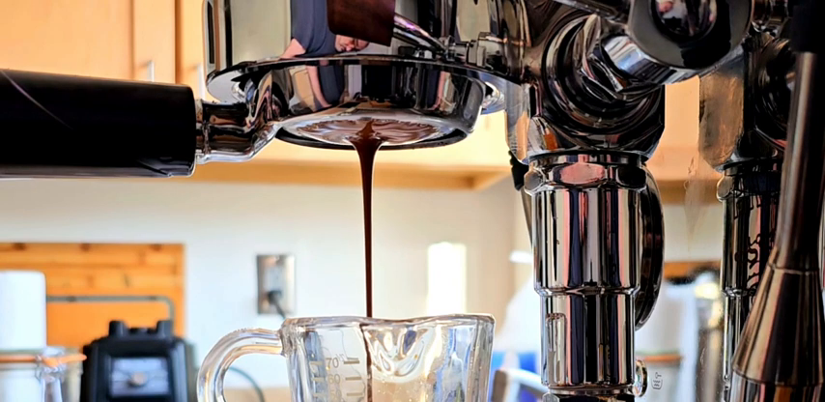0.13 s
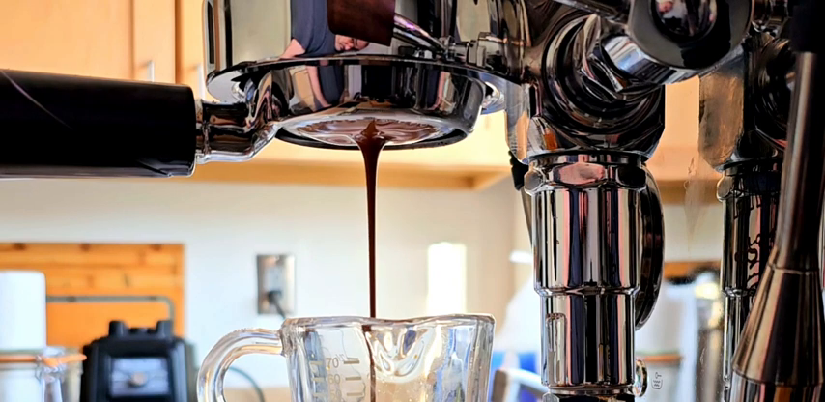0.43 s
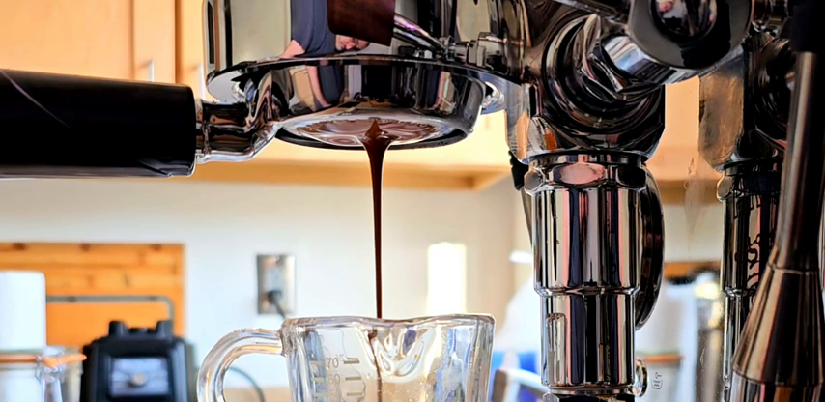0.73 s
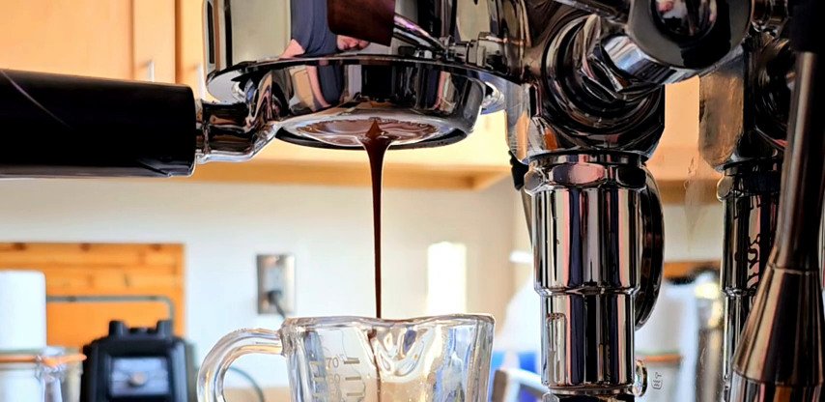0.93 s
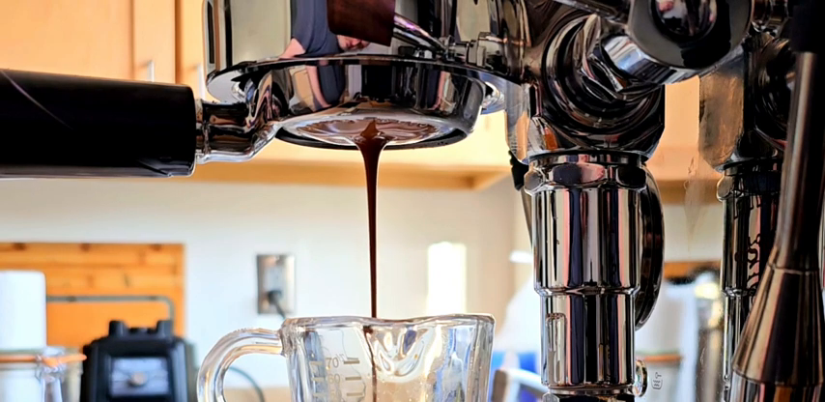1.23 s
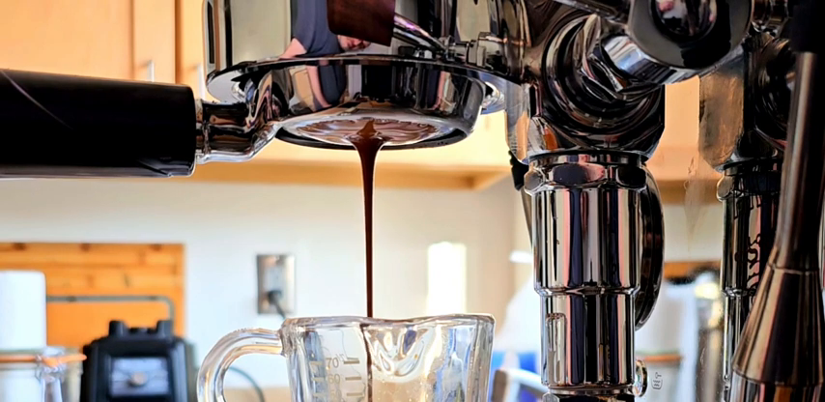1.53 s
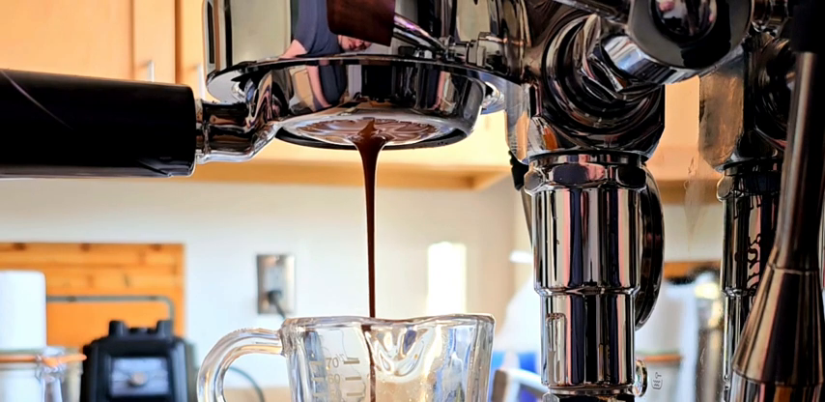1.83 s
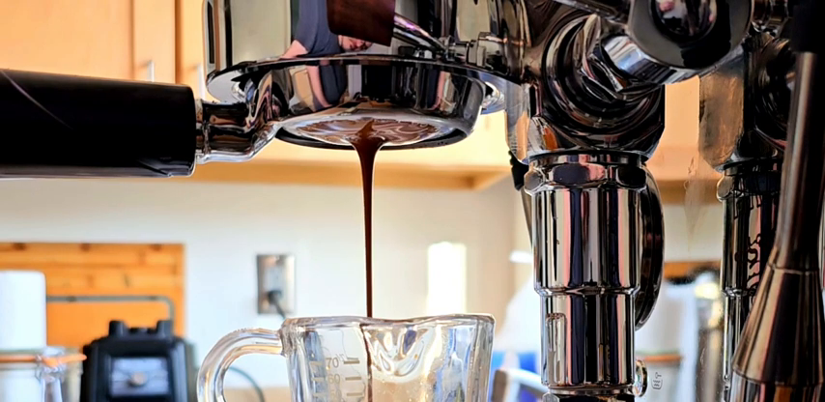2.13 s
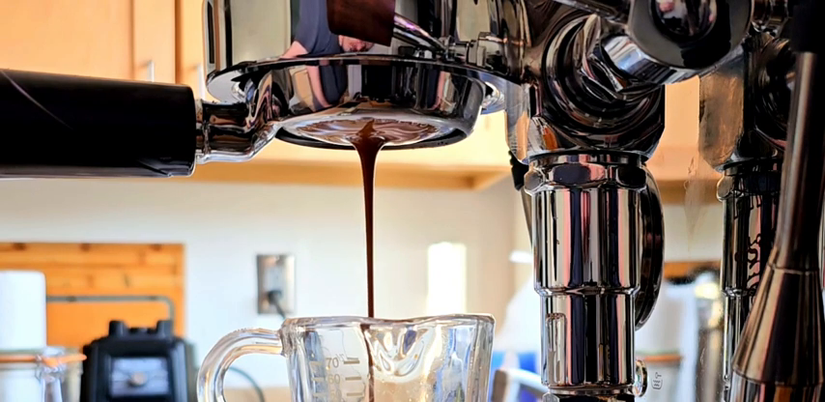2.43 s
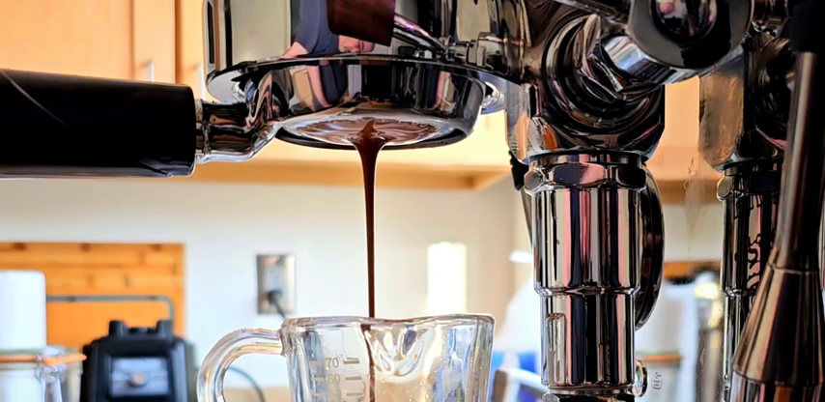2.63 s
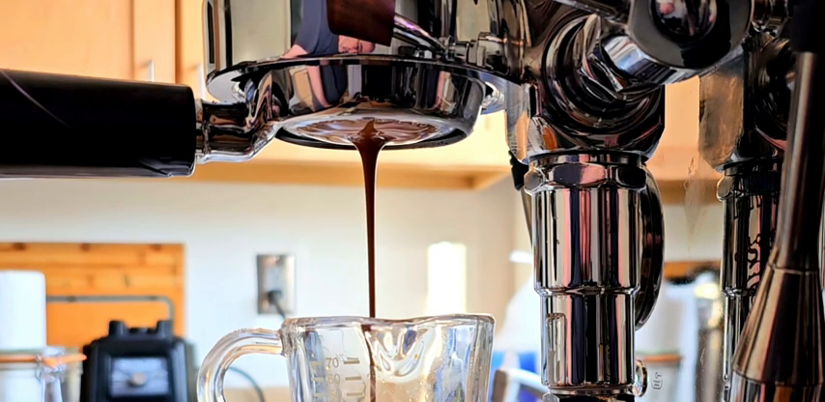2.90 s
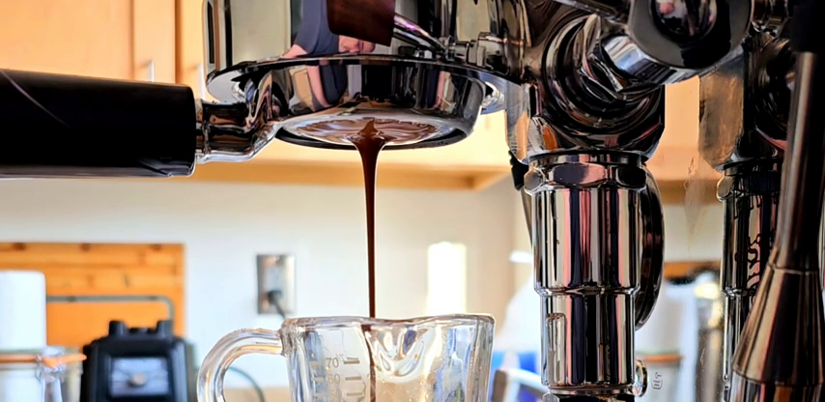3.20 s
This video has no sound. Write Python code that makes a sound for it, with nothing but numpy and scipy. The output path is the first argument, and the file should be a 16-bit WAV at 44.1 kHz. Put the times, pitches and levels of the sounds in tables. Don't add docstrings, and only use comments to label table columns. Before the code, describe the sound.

An espresso machine pump hums throughout, steady and low with a buzzing edge, fine steel rattle and airy hiss, close in stereo. Appliances rumble behind; a faint coffee tone in the jug sinks and fades by about 1.7 s. Tiny handling snaps start immediately; ticks, hollow knocks, creaking and rubs crowd 0.7-1.75 s, with a thin squeak around 0.9-1.2 s. Sparse ticks follow, then chirps from 3.0 s and a final squeak at 3.35 s.

```python
import sys
import numpy as np
from scipy import signal
from scipy.fft import rfft, irfft, next_fast_len
from scipy.io import wavfile
from scipy.ndimage import uniform_filter1d, map_coordinates

SR = 44100
rng = np.random.default_rng(int(sys.argv[2]) if len(sys.argv) > 2 else 0)


def undo_db(level):
    steps = np.asarray(level, float) / 20
    return 10 ** steps


def dump_mix(stems):
    frames = np.atleast_2d(stems).T
    limited = np.clip(frames, -1, 1)
    pcm = np.round(limited * 32767).astype(np.int16)
    wavfile.write(sys.argv[1], SR, pcm)


N = 148176
SHAFT_HZ, MAINS_HZ = 56.108, 120

# t/s, extra sound travel/ms
PHONE_DRIFT = [
    (.92, 0),
    (1.22, .62),
    (2.93, .62),
    (3.13, 1.12),
]
# order, left level/dB, right level/dB, left lead/rad
LOW_ORDERS = [(1, -58, -57, -0.1), (2, -48, -47, -0.0), (4, -32, -33, -0.4), (6, -70, -61, -0.9),
              (7, -62, -65, -0.6), (8, -40, -41, -1.2), (9, -60, -60, -1.3), (10, -64, -62, -0.7),
              (11, -78, -67, 2.9), (12, -58, -53, 2.9), (14, -61, -56, 0.5), (15, -57, -57, 1.1),
              (16, -56, -52, 1.9), (17, -65, -73, -1.4), (18, -61, -62, -1.3), (19, -60, -63, -2.6),
              (20, -52, -53, -2.8), (22, -62, -72, 3.0), (23, -68, -60, 1.4), (24, -65, -55, -1.7),
              (26, -73, -68, -1.7), (28, -56, -63, -0.4), (30, -65, -82, -0.8)]
# order, left level/dB, right level/dB, left lead/rad
HIGH_ORDERS = [(31, -78, -101, -2.3), (32, -65, -84, -3.0), (34, -72, -95, -0.1), (36, -79, -73, -2.6),
               (37, -83, -73, 2.3), (38, -80, -82, -1.1), (39, -77, -88, 1.9), (40, -71, -74, -1.6),
               (43, -79, -84, 0.2), (44, -72, -80, -2.3), (45, -76, -80, 2.9), (48, -77, -77, 0.8),
               (49, -72, -80, 1.1), (51, -86, -79, -1.3), (52, -77, -77, -0.1), (53, -81, -78, -1.3),
               (56, -77, -79, -0.1), (58, -80, -79, 1.9), (62, -83, -89, 2.7), (64, -81, -87, 1.7),
               (67, -82, -113, 2.7), (68, -87, -82, -1.2), (72, -83, -74, -1.6), (76, -89, -79, -2.6),
               (80, -100, -81, -1.6), (84, -82, -90, 0.2)]
# shaft order, multiples of the pull added, level/dB
SIDEBANDS = [(0, 1, -50), (0, 2, -58.5), (3, 1, -55.5), (17, -1, -63), (20, -1, -58), (24, -1, -60),
             (24, 1, -74), (28, 1, -65.5)]
# f/Hz, width/Hz, level/dB, left over right/dB
CASE_MODES = [(7320, 230, -6.5, 10), (8280, 290, -10.5, 14), (8600, 350, -5.5, 10), (9270, 110, -8, 14),
              (9850, 96, 4.5, -10.5), (10290, 120, -2, -23), (10800, 390, -11, -12),
              (11560, 220, -3, -24.5), (12500, 310, -24, 3), (13200, 150, -12, 14), (13560, 200, -1.5, 5),
              (14120, 290, -4.5, -8), (14600, 280, -11, 0), (15500, 500, -14, -1)]
# f/Hz, level/dB
DRONES = [(52, -49), (59, -52), (73, -53.5), (98, -54.5), (135, -52.5), (195, -56), (209, -59.5)]
# f/Hz, level per Hz/dB
RUMBLE = [(12, -51), (20, -18), (103, 2), (166, -3), (222, -1.5), (275, -5), (400, -58), (520, -71),
          (880, -120)]
# f/Hz, level per Hz/dB
BODY_NOISE = [(180, -40), (300, -5), (391, -16), (447, -3.5), (615, -26), (885, -17.5), (1600, -23.5),
              (2500, -31.5), (3250, -41), (5500, -120)]
# f/Hz, level per Hz/dB
HISS = [(1060, 1), (1800, -18), (2570, -11.5), (6190, -11), (6840, -14.5), (10000, -8.5), (15800, -8.5)]
# f/Hz, correlation
MIC_LIKENESS = [(60, .95), (130, 0.97), (290, 0.27), (640, 0.65), (1400, 0.1)]
# f/Hz, width/Hz, level/dB
HISS_DIPS_BUMPS = [(1170, 220, -4), (2580, 83, -18), (3950, 250, 3), (5200, 160, 2.5), (5720, 110, -7),
                   (6900, 150, -9), (7870, 150, -9)]
# t/s, f/Hz, level/dB
JUG = [
    (0, 466.5, -44.5),
    (.5, 462.3, -44.5),
    (.95, 460, -47),
    (1.2, 457.5, -52),
    (1.7, 456, -58),
    (3.4, 454, -65),
]
# t/s, level/dB, f/Hz
SNAPS = [(.028, -40, 13000), (.034, -47.5, 7000), (.193, -49.5, 3830), (.267, -49, 11500),
         (.403, -43, 15000), (.505, -48, 4200), (.505, -46, 11000), (0.685, -51.5, 6500), (.783, -48, 3280),
         (.902, -53, 7000), (1.078, -42, 7380), (1.558, -52, 8500), (1.658, -49, 5400), (1.686, -52, 4460),
         (1.8, -47, 7000), (3.014, -47, 9030), (3.298, -48, 7600)]
# start t/s, length/s, level/dB, f/Hz
RUBS = [
    (0.096, .15, -64, 2190),
    (0.777, 0.44, -60.5, 3800),
    (1.304, .2, -63, 1900),
    (1.404, 0.14, -60, 3060),
    (1.645, 0.06, -57, 3500),
    (1.957, .22, -62, 3750),
    (2.75, 0.17, -59, 3820),
    (3.04, 0.33, -65.5, 4500),
]
# t/s, peak level/dB, f/Hz
TICKS = [(.192, -42, 2140), (.539, -43, 1870), (.781, -31.5, 1870), (.818, -35, 1780), (.855, -34, 1830),
         (.907, -44, 1900), (.93, -41, 1860), (1.116, -49, 3610), (1.192, -42, 1720), (1.205, -32, 1450),
         (1.214, -33, 1200), (1.336, -42, 1900), (1.416, -35, 1900), (1.425, -43, 1800),
         (1.461, -35.5, 1700), (1.6, -41, 1700), (1.656, -38, 1747), (1.686, -34.5, 1700),
         (2.342, -39, 1570), (2.711, -42, 1490)]
# t/s, peak level/dB, f/Hz
CHIRPS = [(.433, -49, 5150), (1.426, -50, 3860), (1.658, -42.5, 4800), (1.664, -44, 3910),
          (1.709, -45, 5070), (3.095, -48, 3760), (3.117, -53, 4450), (3.138, -51, 5200),
          (3.219, -47, 4370), (3.244, -48, 4400), (3.257, -47, 4100), (3.02, -48, 8400)]
# t/s, f/Hz, level/dB
CREAK = [
    (.74, 794, -52),
    (.95, 771, -53),
    (1.73, 699, -58.5),
]
# t/s, peak level/dB
KNOCKS = [(.747, -44), (.783, -38), (.818, -43), (.837, -49), (.856, -45), (.888, -46), (.909, -42),
          (.932, -39), (.985, -48), (1.015, -43), (1.116, -46), (1.149, -45), (1.209, -41), (1.269, -42),
          (1.322, -47), (1.47, -48), (1.507, -43), (1.542, -44), (1.604, -47), (1.661, -40), (1.689, -42),
          (1.715, -48)]
# t/s, f/Hz, level/dB
SQUEAK = [
    (.845, 4040, -64),
    (.881, 4194, -49),
    (.905, 4260, -48),
    (.92, 4300, -58),
    (.951, 4298, -53),
    (.972, 4265, -56),
    (.995, 4280, -49),
    (1.006, 4270, -63),
    (1.036, 4240, -66),
]
# t/s, f/Hz, level/dB
SQUEAK_LOW = [
    (1.04, 4140, -60),
    (1.075, 4100, -57),
    (1.1, 4000, -63),
    (1.127, 3990, -58),
]
# t/s, f/Hz, level/dB
SQUEAK_HIGH = [
    (1.076, 4300, -53),
    (1.09, 4230, -51),
    (1.106, 4150, -62),
]
# t/s, f/Hz, level/dB
SQUEAK_END = [
    (1.128, 3380, -59),
    (1.165, 3340, -59),
    (1.19, 3180, -72),
]
# t/s, f/Hz, level/dB
SQUEAK_LATE = [
    (3.344, 4080, -58),
    (3.37, 4200, -43),
]


def unit(x):
    return x / np.sqrt(np.mean(x ** 2) + 1e-20)


def along(points, hz):
    f, v = np.transpose(points)
    return np.interp(np.log(hz + 1), np.log(f + 1), v, left=v[0], right=v[-1])


def curves(rows):
    s, *cols = np.transpose(rows)
    return [np.interp(np.arange(N) / SR, s, c) for c in cols]


def wobble(rate):
    knots = rng.standard_normal(int(N * rate / SR) + 4)
    return map_coordinates(knots, [np.arange(N) * rate / SR])


def filtered(x, response):
    m = next_fast_len(N + SR // 2)
    return irfft(rfft(x, m) * response(np.fft.rfftfreq(m, 1 / SR)), m)[..., :N]


def peak(f, hz, width_hz):
    return 1j * f * width_hz / (hz * hz - f * f + 1j * f * width_hz)


def rush(spectrum):
    def mid_side(f):
        turn = np.arccos(np.clip(along(MIC_LIKENESS, f), -1, 1)) / 2
        return undo_db(along(spectrum, f)) * [np.cos(turn), np.sin(turn)]

    mid, side = filtered(rng.standard_normal((2, N)), mid_side)
    return unit(np.array([mid + side, mid - side]))


def tone(turns, lead):
    sides = np.array([[lead / 2], [-lead / 2]])
    return np.sqrt(2) * np.sin(2 * np.pi * (turns + rng.random()) + sides)


def glide(rows, rough_db, rate, lead):
    hz, db = curves(rows)
    t = np.arange(N) / SR
    on = uniform_filter1d(1. * (t > rows[0][0]) * (t < rows[-1][0]), size=300)
    turns = np.cumsum(hz) / SR + rough_db / 50 * wobble(rate)
    return on * undo_db(db + rough_db * wobble(rate)) * tone(turns, lead)


def heard_s():
    return np.arange(N) / SR - curves(PHONE_DRIFT)[0] / 1000


def high_orders():
    k = np.arange(31, 165)
    fall_db, vane_db, scatter_db = .05, 4, 4
    db = -87 - fall_db * (k - k[0]) + vane_db * (k % 4 == 0)
    db = db + scatter_db * rng.uniform(-1, 1, (2, len(k)))
    leads = rng.uniform(-np.pi, np.pi, len(k))
    for order, left, right, lead in HIGH_ORDERS:
        db[:, k == order] = [[left + 1], [right + 1]]
        leads[k == order] = lead
    return list(zip(k, *db, leads))


def pump():
    t = heard_s()
    hum = np.zeros((2, N))
    for k, left, right, lead in list(LOW_ORDERS) + high_orders():
        hum += undo_db([[left], [right]]) * tone(round(k) * SHAFT_HZ * t, lead)
    for k, m, db in SIDEBANDS:
        hz = round(k) * SHAFT_HZ + round(m) * MAINS_HZ
        hum += undo_db(db + 1.3 * wobble(4.64)) * tone(hz * t, min(hz / 400, 2.2))
    return hum


def rattle():
    t = heard_s()
    pull = 2 * np.pi * MAINS_HZ * t
    clatter = map_coordinates(rng.standard_normal(1024), [SHAFT_HZ * t % 1 * 1024], mode="grid-wrap")
    clatter = clatter * (0.087 + np.cos(pull) + undo_db(-5) * np.cos(2 * pull + 1))
    common, *apart = rng.standard_normal((3, N))
    vanes = 1 + 0.19 * np.cos(8 * np.pi * SHAFT_HZ * t)
    gated = (common + 0.51 * np.array(apart)) * vanes * undo_db(0.52 * wobble(8.0))
    side = np.array([[.5], [-.5]])

    def case(f):
        modes = sum((-1) ** i * undo_db(db + pan_db * side) * peak(f, hz, width)
                    for i, (hz, width, db, pan_db) in enumerate(CASE_MODES))
        return np.exp(2j * np.pi * f * side * .00074) * modes

    return undo_db(-61.5) * unit(filtered(clatter, case)) + undo_db(-58) * unit(filtered(gated, case))


def kitchen():
    t = np.arange(N) / SR
    drones = sum(undo_db(db + 4.1 * wobble(4.31)) * tone(hz * t + 0.051 * wobble(3.32), 0.17)
                 for hz, db in DRONES)

    def dips_bumps(f):
        return undo_db(sum(db * np.exp(-((f - hz) / width) ** 2) for hz, width, db in HISS_DIPS_BUMPS))

    rumble = undo_db(-46) * rush(RUMBLE)
    body = undo_db(-50.5 + 0.71 * wobble(8.9)) * rush(BODY_NOISE)
    hiss = undo_db(-51 + 0.5 * wobble(8.32)) * filtered(rush(HISS), dips_bumps)
    return drones + rumble + body + hiss


def jug():
    return glide(JUG, rough_db=1, rate=6, lead=.5)


def snaps():
    x, t = np.zeros(N + SR), np.arange(SR // 16) / SR
    f = np.fft.rfftfreq(len(t), 1 / SR)
    t60_s, width = .035, .3
    for s, db, hz in SNAPS:
        noise = rfft(rng.standard_normal(len(t)))
        puff = unit(irfft(noise * peak(f, hz, width * hz) ** 2, len(t)))
        x[round(s * SR):][:len(t)] += undo_db(db - 60 * t / t60_s) * (1 - np.exp(-t / 0.00092)) * puff
    return x[:N]


def rubs():
    t = np.arange(N) / SR
    out = np.zeros((2, N))
    for s, long, db, hz in RUBS:
        fade = np.clip(np.minimum(t - s, s + long - t) / 0.014, 0, 1)
        grains = rng.standard_normal((2, N)) * undo_db(0.95 * wobble(70))
        out += undo_db(db) * fade * unit(filtered(grains, lambda f: peak(f, hz, 1.06 * hz) ** 2))
    return out


def taps():
    x, t = np.zeros(N + SR), np.arange(SR // 8) / SR
    creak_hz = curves(CREAK)[0]
    knocks = [(s, db, creak_hz[round(s * SR)]) for s, db in KNOCKS]
    for rows, t60_s in ((TICKS, .021), (CHIRPS, .035), (knocks, .061)):
        for s, db, hz in rows:
            modes = np.sin(2 * np.pi * hz * t * np.array([[1], [.93], [1.08]]))
            ring = np.array([1, .4, .4]) @ modes * undo_db(-60 * t / t60_s) * (1 - np.exp(-t / .0015))
            noise = np.convolve(rng.standard_normal(len(t)), np.hanning(int(SR / hz / 3) + 3), "same")
            crack = .12 * undo_db(-60 * t / 0.0037) * noise * np.sqrt(hz / SR * 6)
            x[round(s * SR):][:len(t)] += undo_db(db) * (ring + crack)
    return x[:N]


def creak():
    grains = uniform_filter1d(rng.standard_normal(N) * undo_db(1.7 * wobble(60)), size=300)
    return unit(grains) * glide(CREAK, rough_db=-0.5, rate=7.8, lead=1.5)


def squeaks():
    strands = (SQUEAK, SQUEAK_LOW, SQUEAK_HIGH, SQUEAK_END, SQUEAK_LATE)
    return sum(glide(rows, rough_db=2, rate=90, lead=.8) for rows in strands)


def hand():
    x = snaps() + taps()
    contacts = np.array([x, np.roll(x, 1)])
    return (contacts + squeaks() + rubs()) * undo_db([[2], [-2]]) + creak()


def room(x):
    t = np.arange(SR // 4) / SR
    tail = rng.standard_normal((2, len(t))) * undo_db(-60 * t / 1.6)
    return signal.fftconvolve(x, tail / np.linalg.norm(tail[0]), axes=1)[:, :N]


def scene():
    near = hand()
    return pump() + rattle() + kitchen() + jug() + near + undo_db(-13) * room(near)


def roll_off(x):
    return signal.sosfilt(signal.butter(12, 15930, fs=SR, output="sos"), x)


def record(dry):
    mix = filtered(dry, lambda f: f < 15780)
    return roll_off(mix)


dry = scene()
out = record(dry)
dump_mix(out)
```